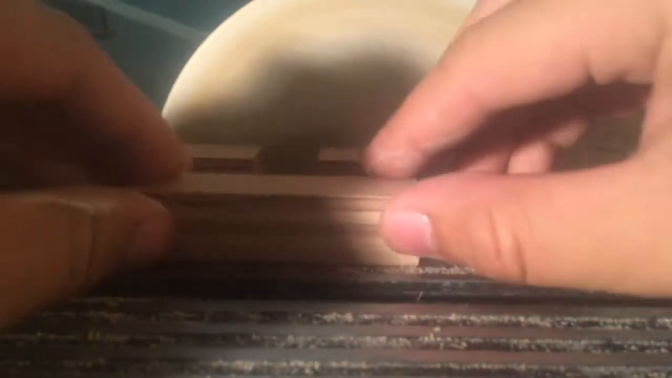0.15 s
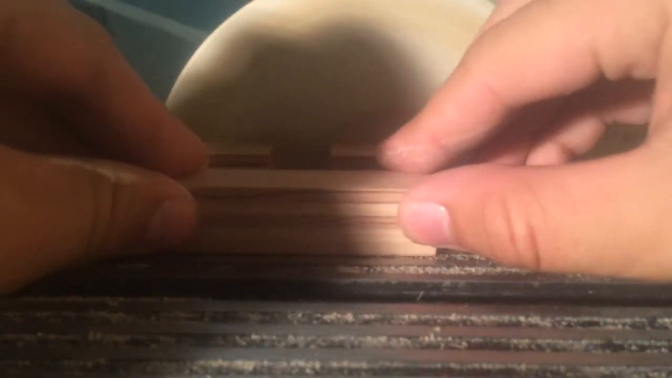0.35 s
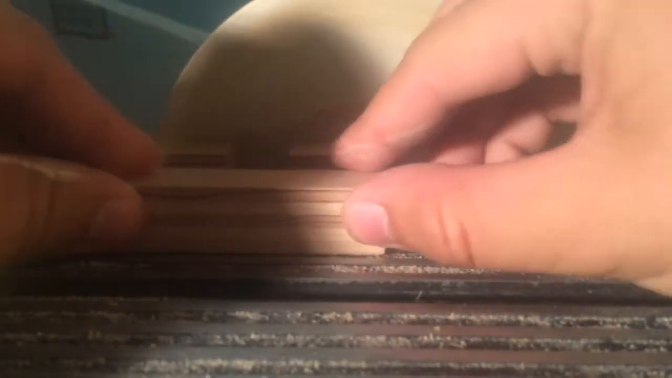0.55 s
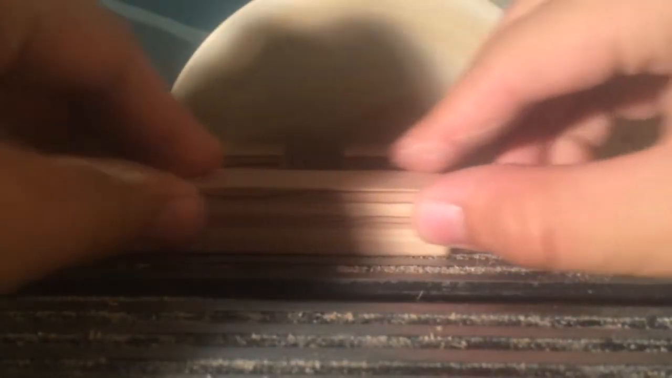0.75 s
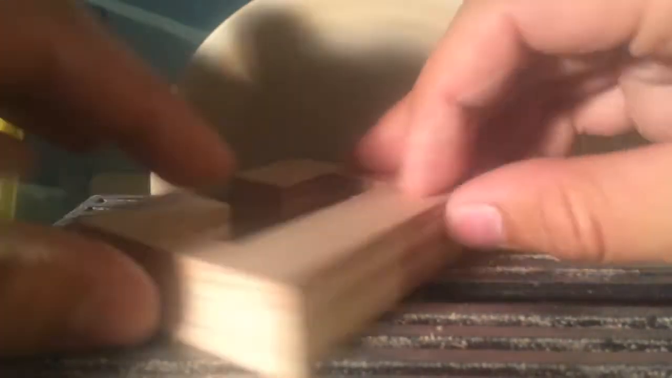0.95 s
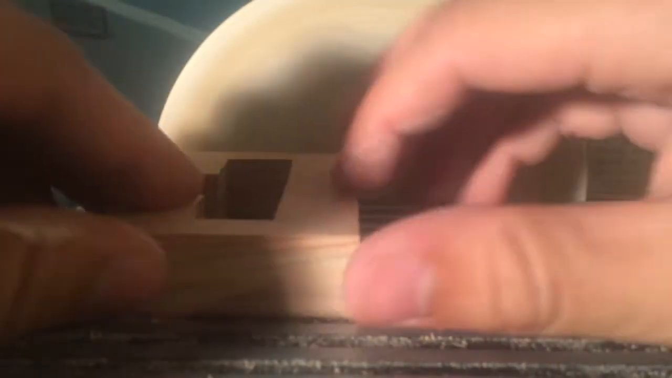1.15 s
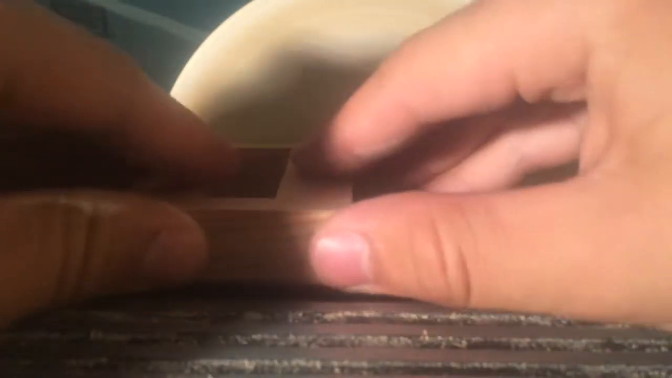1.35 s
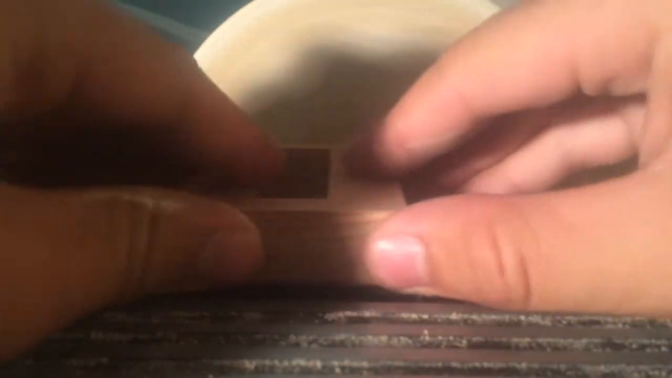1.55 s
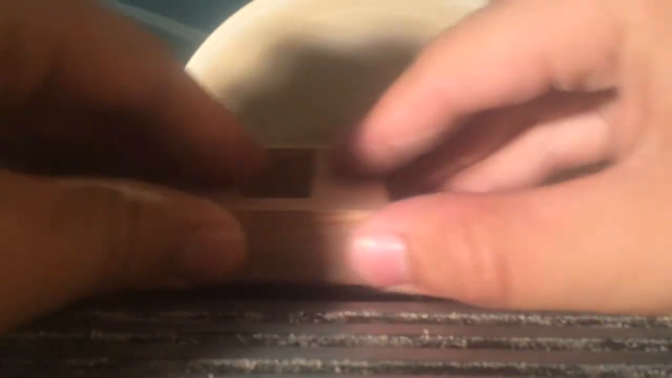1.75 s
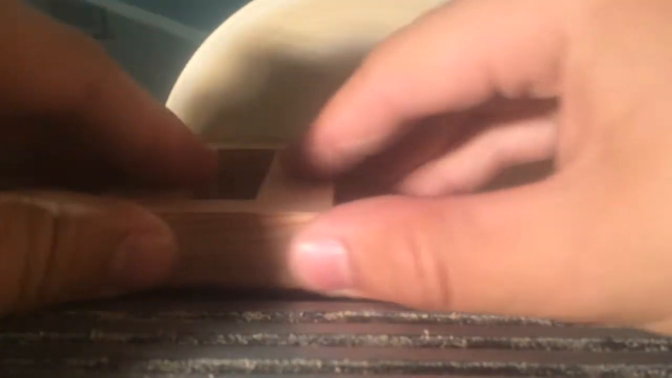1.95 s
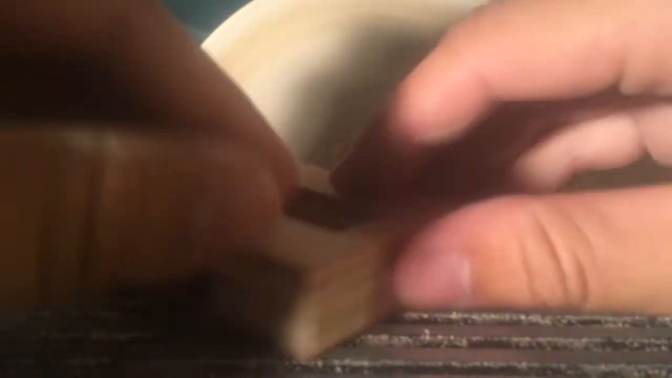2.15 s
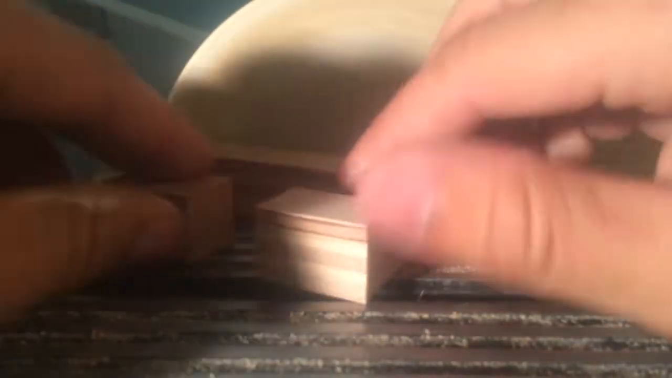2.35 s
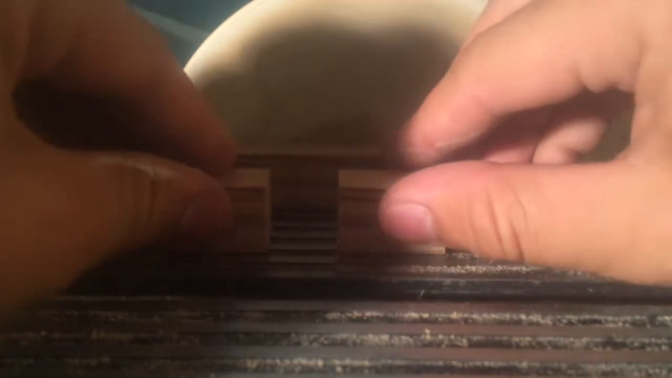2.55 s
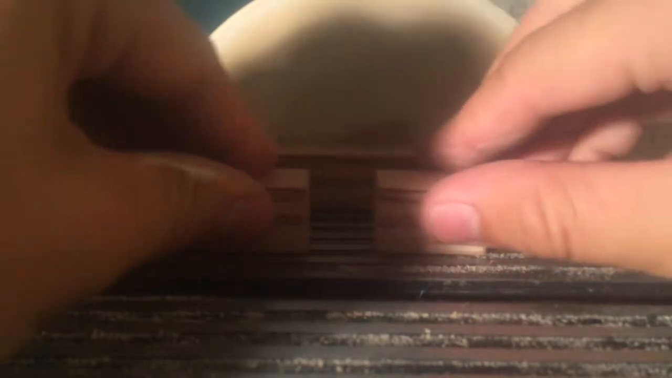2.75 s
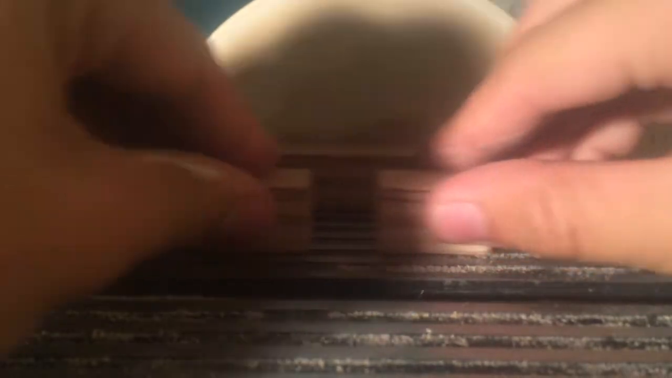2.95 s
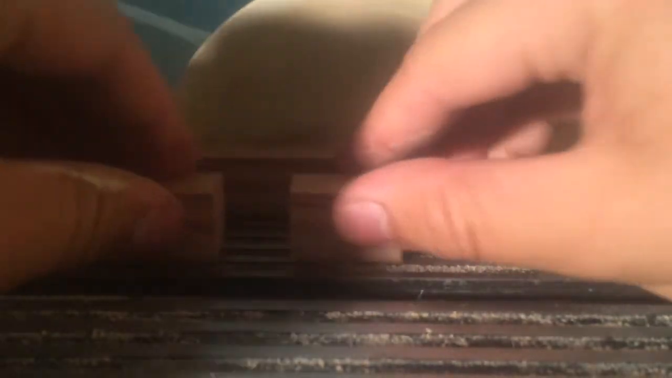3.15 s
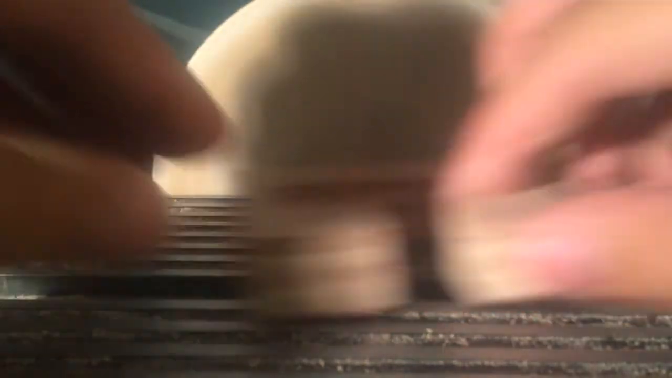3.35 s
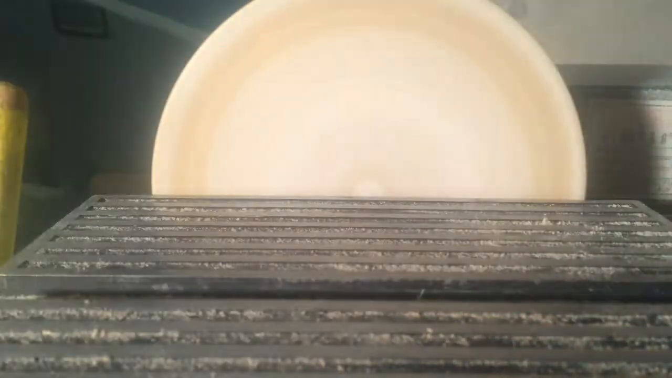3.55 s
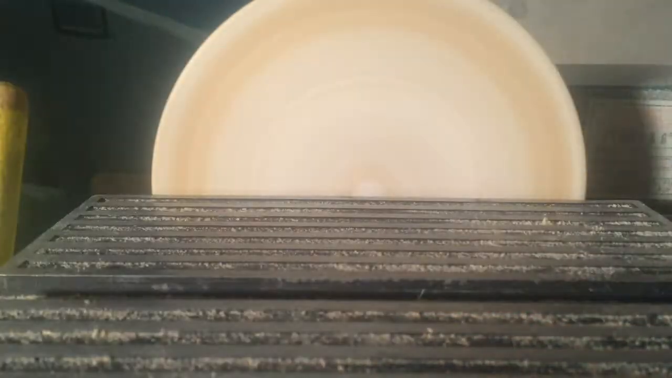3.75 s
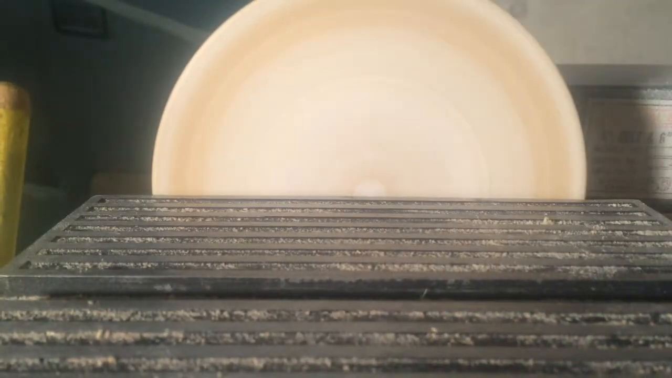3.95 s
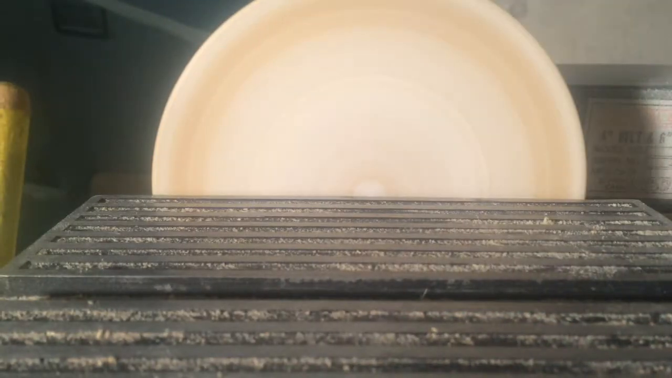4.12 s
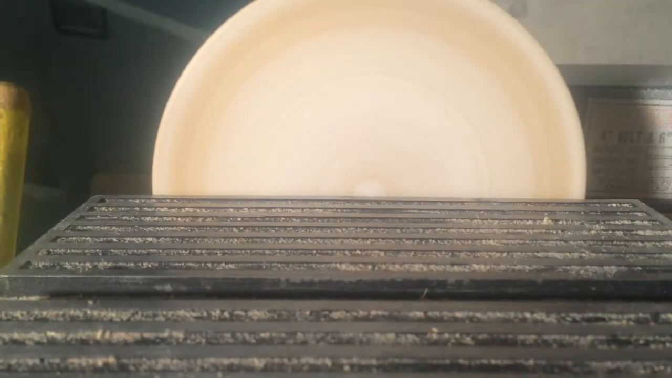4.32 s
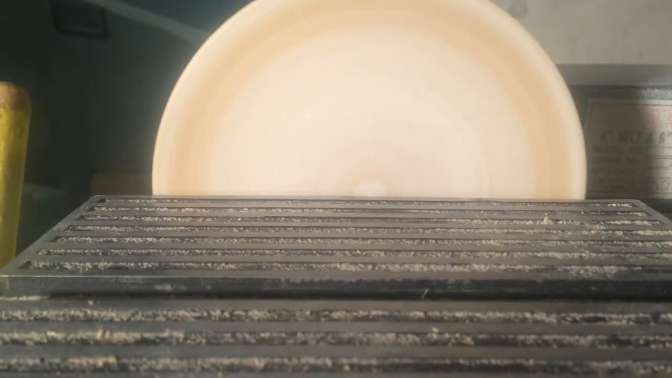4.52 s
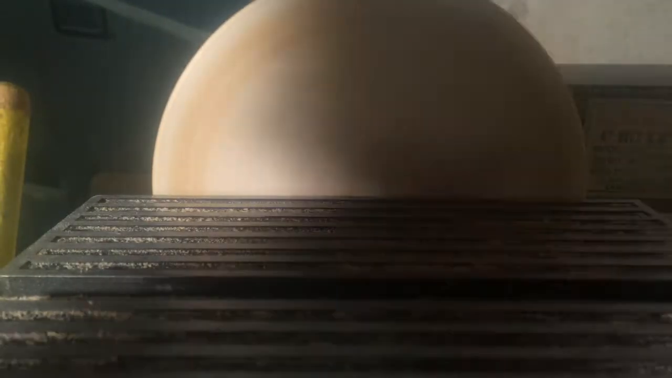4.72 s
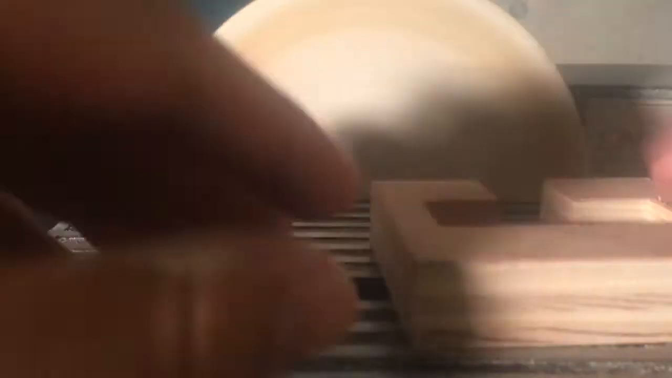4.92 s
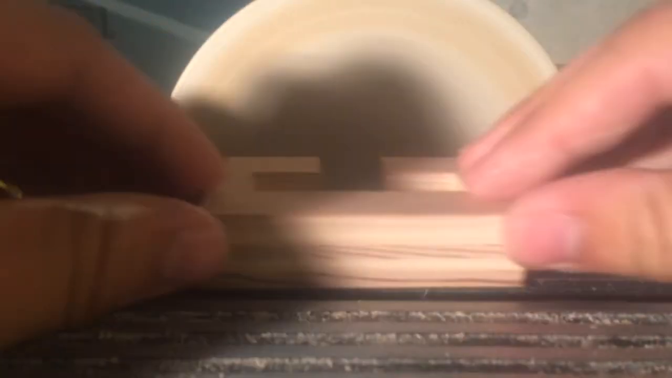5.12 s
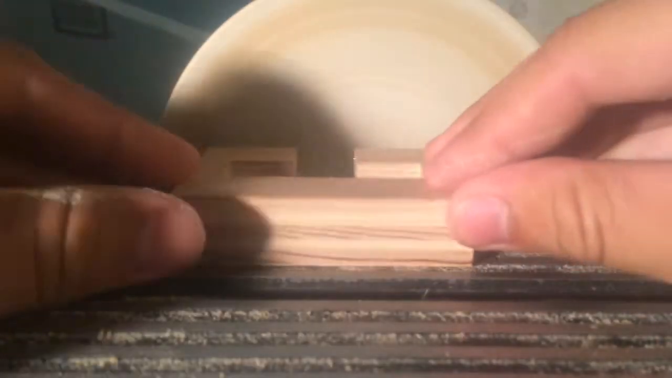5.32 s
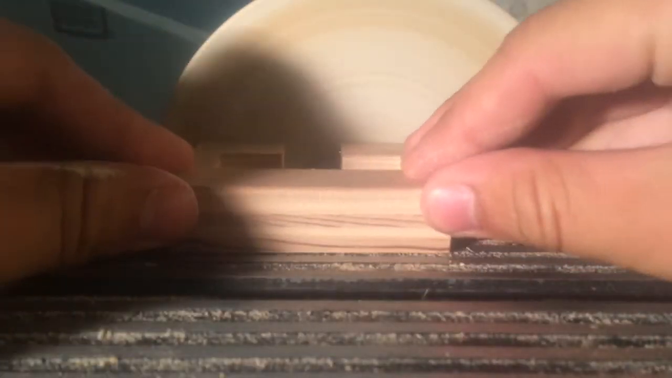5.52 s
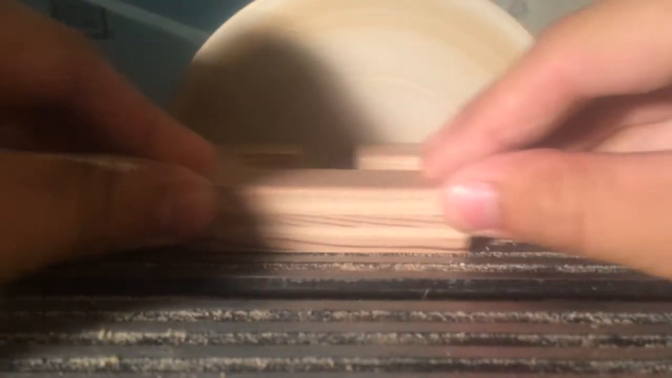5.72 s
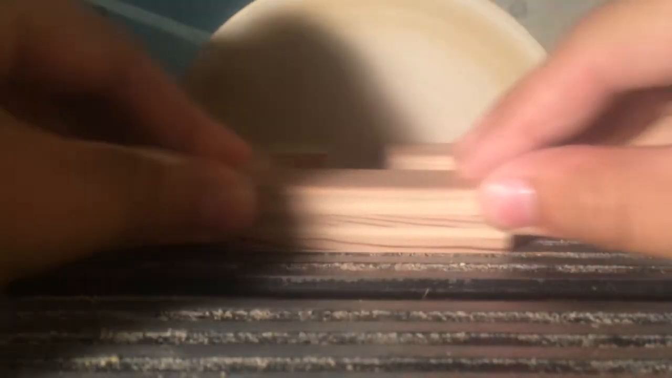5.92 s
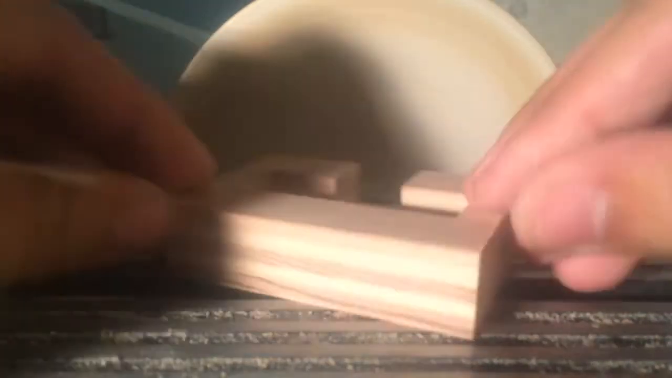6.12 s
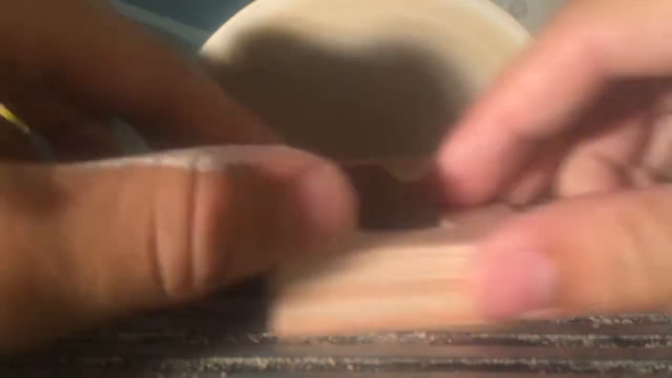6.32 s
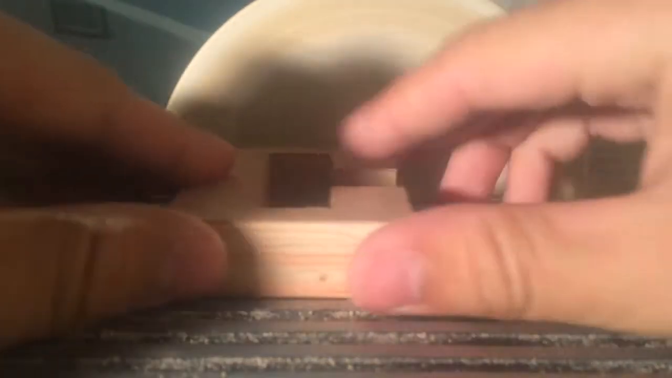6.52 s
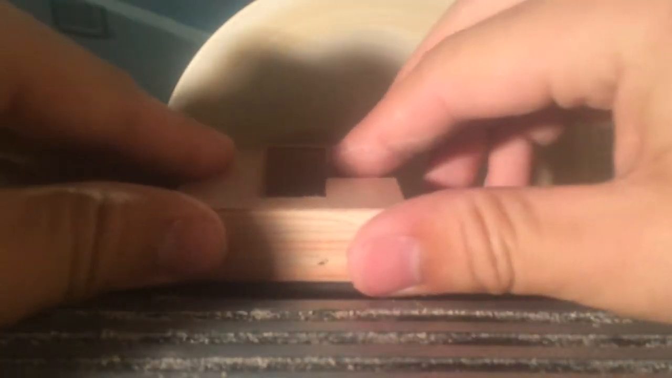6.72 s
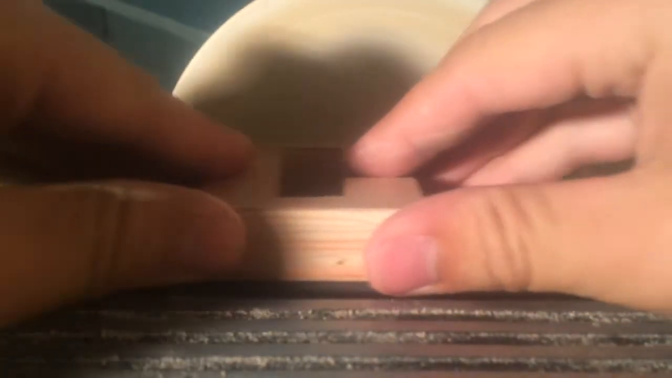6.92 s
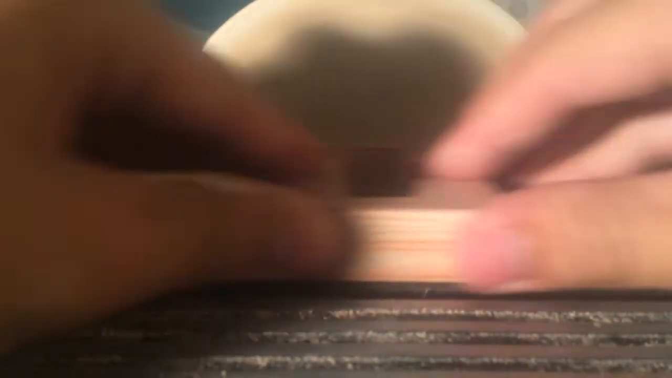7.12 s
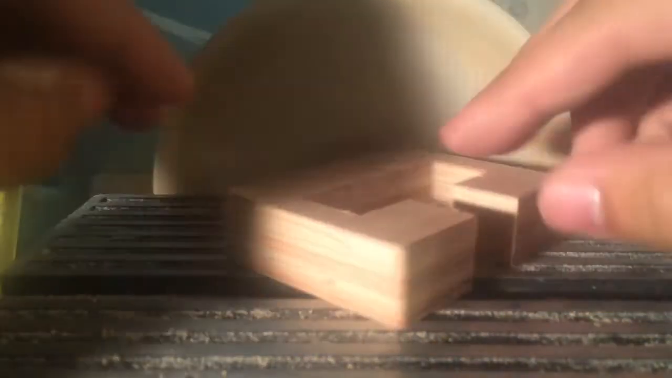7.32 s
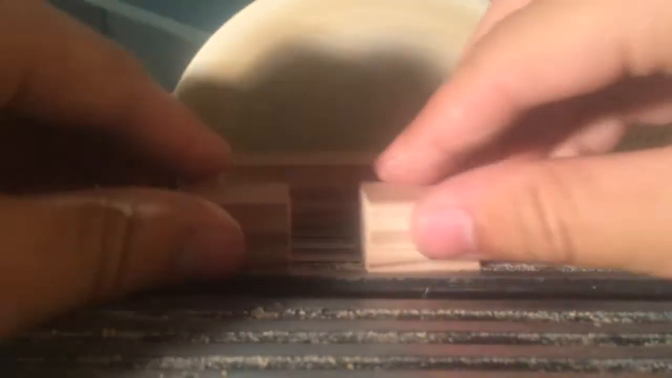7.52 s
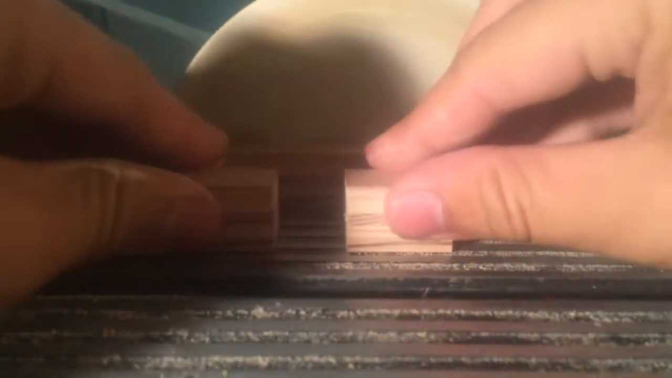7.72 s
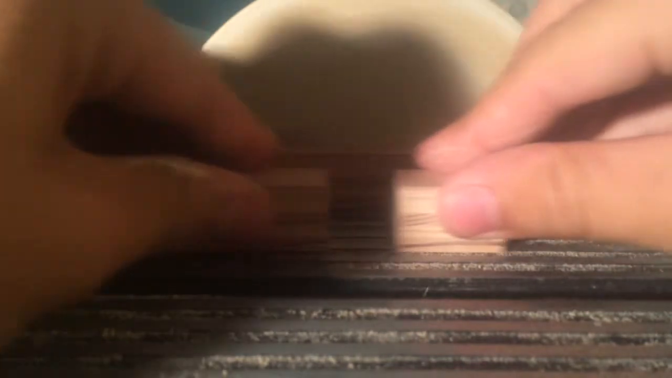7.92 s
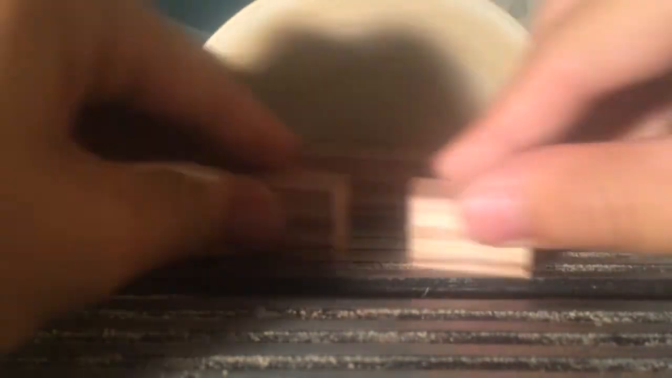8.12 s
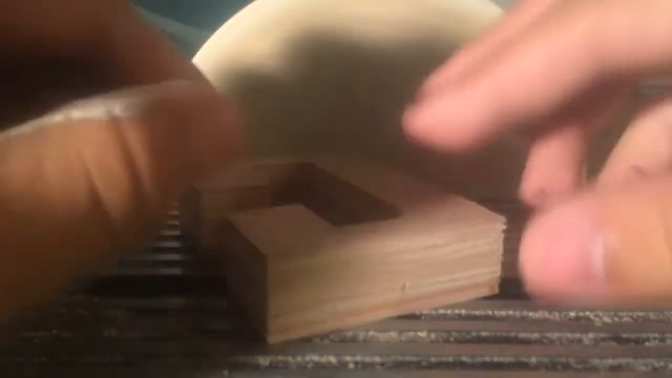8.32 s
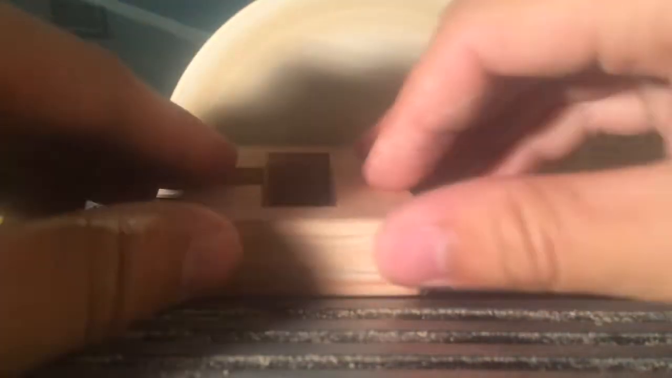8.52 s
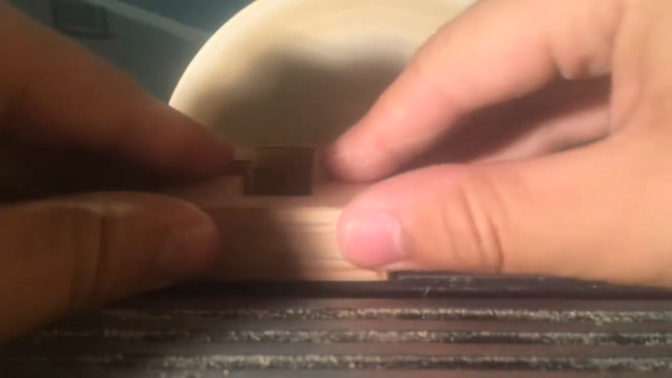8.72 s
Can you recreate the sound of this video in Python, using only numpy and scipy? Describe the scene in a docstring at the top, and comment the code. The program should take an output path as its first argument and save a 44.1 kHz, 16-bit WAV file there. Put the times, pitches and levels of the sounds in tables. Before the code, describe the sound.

A small disc sander is already running close to the microphone, with steady hum, thin bearing whine and rushing air. A plywood piece chatters rapidly on the shaking table. Harsh, bright gritty rasps come at about 0.3-0.85, 1.4-2.0 and 2.6-3.2 seconds, starting sharply and tinged with woody squeals; the motor ducks beneath each and recovers. The rattle is fainter around the third and ends near 3.3. The uncovered disc hisses more openly until 4.8, with a small click at 3.7, a very brief level dip at 3.9 and a click with a dull bump at 4.2. A strong wooden clack lands near 4.9, then firmer rattling and knocks return from 5.1. More rasps follow at 5.6-6.1, 6.7-7.2 and 7.7-8.2, with a prominent squeal at 6.7. A last, lighter one begins at 8.65, cut off at 8.8. Nearby surfaces give a short tail.

```python
"""A small electric disc sander idles close to the microphone in a workshop: hum, whining bearings, rush of air.
From the start a plywood piece rattles on the shaking table; three passes then press it to the disc and the grit
rasps, rings and squeals its modes. In the lull the rattle stops, the hiss opens up, the level dips briefly and
wood clicks and bumps. The rattle returns, and four more passes follow, the piece turned between passes.
Gain control pushes the motor down as the rasp swells; bench and nearby walls lend the wood a short tail."""
import sys
import numpy as np
from scipy import signal
from scipy.fft import rfft, irfft, next_fast_len
from scipy.io import wavfile
from scipy.ndimage import uniform_filter1d, minimum_filter1d

SR = 44100
rng = np.random.default_rng(int(sys.argv[2]) if len(sys.argv) > 2 else 0)


def persist_wave(psi):
    """Save psi, clipped to +-1, as 16-bit WAV."""
    counts = np.round(np.clip(psi, -1, 1) * 32767).astype(np.int16)
    wavfile.write(sys.argv[1], SR, np.atleast_2d(counts).T)


N = 386316

# All levels are relative, as set ahead of the later gains and of the gain control.
# speed of the disc when idle and under load [turns per s]
IDLE_HZ, TURN_HZ = 59.8, 59.17
# hum and whine of the motor: (frequency [Hz], level [dB])
HUM = [(120, -80.5), (174, -73.5), (240, -59), (480, -69.5), (538.3, -70), (660, -71), (855, -79),
       (901, -78.5), (1090, -81), (1106, -73), (1200, -74), (1262, -76), (1346, -65), (1900, -65.5),
       (2939, -67.5), (4062, -67), (4107, -63.5), (5421, -66), (5705, -63.5), (6503, -68), (6530, -72),
       (6562, -79), (7402, -74)]
# resonances of the housing, stirred by the bearings: (frequency [Hz], pole width [Hz], level [dB])
HOUSING = [(1107, 25.6, -58.5), (1327, 220, -57), (1893, 290, -53), (2304, 69, -59.5), (2930, 540, -59.5),
           (3664, 95, -57.5), (4084, 210, -53), (5510, 160, -59.5), (5890, 380, -51.5), (6570, 680, -51.5),
           (7443, 140, -55), (7670, 73, -57.5)]
# rush of air and bearings: (frequency [Hz], spectrum level [dB])
RUSH = [(30, -30), (80, -13.5), (140, -9), (180, -2.5), (560, -1), (780, -6), (1500, 2.5), (3200, 3),
        (5000, 2.5), (7000, 3.5), (8400, -1), (9600, -9.5), (11500, -14.5), (16000, -23)]
# the hands leave the disc uncovered and its hiss comes through: (from [s], to [s], gain [dB])
UNCOVERED = (3.4, 4.8, 2.6)
SHIELD_HZ = 5000  # the hands shield housing resonances above this
# the piece lies on the shaking table: (from [s], to [s], strength of rattle [dB])
RESTS = [(0, .85, -35.5), (.85, 2.0, -33.5), (2.0, 3.34, -42.5), (5.057, 6.15, -34), (6.15, 8.8, -33)]
# fast faint chatter and slower, firmer rocking of the piece: (hops [per s], level [dB])
HOPS = [(74.95, -2.5), (16.02, 2.5)]
# firmest knocks of the piece on the table: (time [s], level [dB])
KNOCKS = [(0.9524, -34.5), (1.1025, -33), (1.222, -32.5), (1.338, -32.5), (5.0842, -28), (5.404, -32),
          (5.5879, -23.5), (5.911, -29), (6.2314, -27), (6.3674, -32), (6.4157, -32.5), (6.5529, -27.5),
          (6.6007, -27), (6.735, -26), (7.2945, -29.5), (7.6105, -27), (8.121, -27.5), (8.2556, -31.5),
          (8.4406, -27), (8.576, -32.5)]
# modes of the table under a knock: (frequency [Hz], level [dB], t60 [s])
TABLE_MODES = [(1096.7, -11.5, 0.15), (1375, -19, 0.11), (1935, 0.5, 0.036), (2175, 13.5, 0.011),
               (2374, 3, 0.01), (2600, -10, 0.0073)]
DRIVEN_DB = 4  # the disc shakes the piece harder while it touches
# passes against the disc: (start [s], end [s], release [s], base bite: low rasp over high rasp [dB])
PASSES = [(0.274, 0.849, 0.048, -5.5), (1.386, 2.001, 0.035, -0.5), (2.582, 3.184, 0.023, -5),
          (5.56, 6.068, 0.028, -4), (6.693, 7.23, 0.064, -3), (7.718, 8.178, 0.077, -3.5),
          (8.66, 8.8, 0.034, -3)]
# pressure of the hands, one curve a pass: (time [s], level [dB])
PRESSURE = [
    [(0.28, -35), (0.292, -35), (0.304, -27.5), (0.404, -34.5), (0.584, -31), (0.796, -41), (0.81, -42.5)],
    [(1.395, -30.5), (1.435, -39), (1.447, -35.5), (1.589, -40), (1.705, -32.5), (1.749, -37), (1.775, -44),
     (1.97, -37)],
    [(2.59, -30.5), (2.726, -34.5), (2.886, -31), (2.92, -36.5), (3.14, -33), (3.15, -37)],
    [(5.57, -31.5), (5.594, -34), (5.786, -37.5), (5.804, -28.5), (5.966, -37), (6.004, -28.5),
     (6.028, -40), (6.035, -36.5)],
    [(6.7, -33), (6.84, -37), (6.866, -39.5), (6.97, -32.5), (7.002, -35.5), (7.018, -48), (7.034, -35.5),
     (7.17, -39.5)],
    [(7.73, -31), (7.77, -34.5), (7.84, -31.5), (7.97, -35.5), (7.978, -32.5), (8.044, -38), (8.068, -33),
     (8.11, -40.5)],
    [(8.665, -35), (8.671, -33), (8.697, -45), (8.723, -47), (8.733, -52), (8.755, -50)],
]
# plain rasp of the grit: (frequency [Hz], spectrum level [dB])
RASP = [(50, -37), (300, -19.5), (800, -20.5), (1100, -6), (1550, -11.5), (2000, -5), (3800, -4.5),
        (5200, 0.5), (7000, -2), (8800, 1), (11000, -7), (12200, -11), (13800, -11), (15700, -15)]
# main modes of the plywood piece: (frequency [Hz], pole width [Hz])
WOOD = [(1350, 66), (2780, 200), (4650, 590), (6170, 740), (7950, 430), (9400, 880), (10650, 1300)]
# one row a pass, set by the edge that touches the disc: (level of each main mode against the rasp [dB], ...)
EDGES = [(-29, -10, -6, -4, -15, -5, -12), (-23, -12, -2, -5, -15, -27, -12),
         (-19.5, -14, -9, -2.5, -3.5, -14.5, -19), (-26, -13.5, -6, -3.5, -6, -1, -13.5),
         (-20, -17, -11, 1.5, -6, -19.5, -6), (-19.5, -13.5, -11.5, -4, -4, -22, -17),
         (-18, -16, -8.5, -7, -23, -20, -15)]
# weaker plywood modes, alike on every edge: (frequency [Hz], pole width [Hz], level against the rasp [dB])
FAINT_MODES = [(3330, 410, -19.5), (5420, 150, -12), (6170, 70, -10), (8920, 320, -15.5),
               (10000, 280, -14.5), (10500, 210, -16), (12470, 160, -21.5), (14240, 260, -25)]
# the edge meets the grit at once and is drawn away gradually, falling by RELEASE_DB over its release
ATTACK_S, RELEASE_DB = 0.0042, -19
# the rasp is duller as the edge lands, and under a light touch (dB of bite per dB of pressure below firm)
LANDING_BITE_DB, LANDING_S, LIGHT_BITE, FIRM_DB = 4.5, 0.023, 0.43, -35.5
# one mode of the wood catches on the grit:
# (start [s], length [s], frequency [Hz], pole width [Hz], level [dB])
SQUEALS = [(0.274, 0.033, 3340, 1700, -29), (0.406, .15, 9370, 300, -30), (0.498, 0.073, 2740, 150, -42.5),
           (1.412, 0.17, 4600, 330, -33.5), (1.643, .1, 6460, 900, -32), (1.871, 0.11, 4440, 330, -40),
           (1.861, .1, 2830, 300, -44), (2.589, 0.12, 7750, 220, -35), (2.868, 0.32, 2764, 99, -39.5),
           (5.823, 0.042, 4860, 220, -27), (6.7, 0.161, 6140, 220, -25.5), (6.805, 0.21, 4670, 340, -30.5),
           (6.825, 0.195, 5440, 500, -34), (6.97, 0.21, 6100, 180, -34.5), (7.145, 0.064, 4640, 340, -37),
           (7.8, 0.1, 1330, 110, -40), (7.779, 0.12, 2710, 260, -37.5), (7.847, 0.12, 4740, 300, -33.5)]
# clicks of wood: (time [s], level [dB], centre [Hz], width [octaves], t60 [s])
CLICKS = [(.729, -17, 8000, 0.49, .01), (3.664, -34, 3870, 0.41, 0.034), (4.1963, -24, 9100, 0.32, 0.013),
          (4.197, -30, 3530, 0.64, .024), (4.542, -40, 10500, .7, .011), (4.871, -17.5, 4000, 1.9, .045),
          (4.8798, -11.5, 2760, 0.85, 0.02), (4.888, -14.5, 7400, 0.89, .036), (5.085, -36, 2600, .9, .015),
          (5.763, -22, 8000, 0.55, .0092), (6.0354, -16, 7040, 0.59, .03)]
# ring of the loose piece after a click: (frequency [Hz], level [dB], t60 [s])
PIECE = [(2650, -11, 0.056), (4480, -12, 0.12), (4890, -12.5, 0.13), (8150, -13, 0.054)]
# dull bumps on the table: (time [s], level [dB], centre [Hz], t60 [s])
BUMPS = [(3.99, -54, 119.5, 0.2), (4.197, -41, 740, .06), (4.872, -41, 674, 0.067), (5.99, -41, 690, 0.11),
         (5.995, -57, 110, .12)]
BUMP_OCTAVES, BUMP_RING_DB = 0.3, 0  # width of the burst; ring against the burst's peak
# the whole level dips briefly, with the first and last levels held outside: (time [s], level [dB])
DIP = [(3.862, 0.5), (3.875, -13), (3.882, -25), (3.893, -12), (3.915, 0.5)]
CEILING = .118  # peak that the limiter lets through to the band limit (full scale 1)
EDGE_HZ = 15850  # upper band limit


def gain_of(db):
    """Decibels to amplitude."""
    return np.exp(np.asarray(db) * (np.log(10) / 20))


def evened(x):
    """Scales to rms 1."""
    return x / np.sqrt(np.mean(x ** 2) + 1e-20)


def follow(rows):
    """Joins (time, value) rows by straight lines into a value at every sample."""
    return np.interp(np.arange(N) / SR, *np.transpose(rows))


def during(start, end):
    t = np.arange(N) / SR
    return (t >= start) & (t < end)


def add(mix, s, sound):
    """Mixes a sound in at a time."""
    part = mix[max(round(s * SR), 0):][:len(sound)]
    part += sound[:len(part)]


def colour(x, points):
    """Filters by a spectrum of (Hz, dB) points."""
    hz, db = np.transpose(points)
    size = next_fast_len(len(x))
    bins = np.fft.rfftfreq(size, 1 / SR)
    response = gain_of(np.interp(np.log(bins + 1), np.log(hz), db))
    return irfft(rfft(x, size) * response, size)[:len(x)]


def resonate(x, hz, width):
    """A steep-sided resonance of two equal poles, with a zero against the bass, at rms 1."""
    pole = np.exp((2j * hz - width) * np.pi / SR)
    return evened(signal.lfilter([1, -1], np.poly([pole, pole]), x).real)


def drift(size, rate):
    """Slow random wandering around 0, low-passed at a rate in Hz and scaled to rms 1."""
    knots = rng.standard_normal(size // 64 + 2)
    lowpass = signal.butter(2, rate, fs=SR / 64, output="sos")
    slow = evened(signal.sosfilt(lowpass, knots))
    return np.interp(np.arange(size) / 64, np.arange(len(slow)), slow)


def wobble(turns, depth_db, count=256):
    """The disc is not flat: contact swells and slackens in the same way at every turn."""
    angle = np.arange(count) / count
    shape = sum(np.cos(2 * np.pi * (k * angle + rng.random())) / k for k in range(1, 5))
    return gain_of(depth_db * evened(shape))[(turns % 1 * count).astype(int)]


def motor(waver_db=3.0, speed_wander=0.001182, throb_db=1.0, rush_db=-51, orders_db=-77):
    """Magnetic hum, shaft orders, bearing noise ringing in the housing, and a rush of air."""
    t = np.arange(N) / SR
    bent = t + np.cumsum(speed_wander * drift(N, 5.23)) / SR  # the speed wanders by this fraction (rms)

    hum = np.zeros(N)
    for hz, db in HUM:
        waver = waver_db * min(hz / 500, 1.5) * drift(N, 25.5)  # higher tones waver more
        hum += gain_of(db + waver) * np.sin(2 * np.pi * (hz * bent + rng.random()))
    orders = sum(np.sin(2 * np.pi * (k * IDLE_HZ * bent + rng.random())) for k in range(5, 24))

    away, back, open_db = UNCOVERED
    uncovered = gain_of(open_db * uniform_filter1d(during(away, back) * 1., size=4000))
    bearings = np.zeros(N)
    for hz, width, db in HOUSING:
        shield = uncovered if hz > SHIELD_HZ else 1
        bearings += gain_of(db) * shield * resonate(rng.standard_normal(N), hz, width)
    bearings *= wobble(IDLE_HZ * t, throb_db) * gain_of(0.87 * drift(N, 24))

    rush = gain_of(rush_db) * evened(colour(rng.standard_normal(N), RUSH))
    tones = np.sqrt(2) * (hum + gain_of(orders_db) * orders)  # sines to rms level
    return tones + gain_of(-2.0) * bearings + rush


def rattle(knock_db=1.0, uneven_db=1.1, soft_s=0.0014):
    """The piece hops on the shaking table: a few firm knocks among many faint ones ring its modes."""
    t = np.arange(SR // 6) / SR
    ring = sum(gain_of(db - 60 * t / t60) * np.sin(2 * np.pi * hz * t) for hz, db, t60 in TABLE_MODES)
    ring *= 1 - np.exp(-t / soft_s)  # soft contact

    pressed = sum(during(start, end) for start, end, *_ in PASSES)
    resting = sum(gain_of(db) * during(start, end) for start, end, db in RESTS)
    shaking = resting * gain_of(DRIVEN_DB * pressed + uneven_db * drift(N, 12.4))

    blows = np.zeros(N)
    for per_s, db in HOPS:
        # the piece needs time to fall back, so hops are uneven but never pile up
        hops = np.cumsum(rng.uniform(.45, 1.55, size=2000)) * SR / per_s
        hops = hops[hops < N].astype(int)
        blows[hops] += rng.uniform(-1.03, 1, len(hops)) * gain_of(db) * shaking[hops]
    for s, db in KNOCKS:
        add(blows, s, gain_of([db + knock_db]))
    return signal.oaconvolve(blows, ring / abs(ring).max())[:N]


def grit(size, per_s, spread_db):
    """Tiny random impacts of very unequal strength, at rms 1."""
    strength = gain_of(spread_db * np.minimum(rng.exponential(1, size), 4))
    struck = rng.random(size) < per_s / SR
    return evened(rng.standard_normal(size) * strength * struck)


def stroke(start, end, release, bite_db, pressure, edge, repeat=0.35, slip=.002, ring_wobble_db=3,
           rasp_wobble_db=0.5, flutter_db=0.5, sway_db=3.0, ring_db=1.5, level_db=7.5):
    """Grit tears at the wood and rings its modes; some grains come round again at each turn."""
    t = np.arange(start, end, 1 / SR)
    size, share = len(t), np.clip(repeat, 0, 1)
    turns = np.cumsum(TURN_HZ * (1 + slip * drift(size, 8))) / SR  # the load makes the speed uneven

    track = grit(round(SR / TURN_HZ), 22000, 3.4)  # grains of one whole turn
    repeated = track[(turns % 1 * len(track)).astype(int)]
    drive = np.sqrt(share) * repeated + np.sqrt(1 - share) * grit(size, 12000, 2.1)
    drive *= gain_of(flutter_db * drift(size, 55))
    sound = evened(colour(drive * wobble(turns, rasp_wobble_db), RASP))

    modes = [(hz, width, db) for (hz, width), db in zip(WOOD, edge)] + list(FAINT_MODES)
    for hz, width, db in modes:
        # each mode is fed by its own part of the edge, at its own moment of the turn, and sways as the piece rocks
        feed = np.roll(drive, rng.integers(size)) * wobble(turns, ring_wobble_db)
        sway = sway_db * drift(size, 7.8)
        sound += gain_of(db + ring_db + sway) * resonate(feed, hz, width)

    drawn_away = np.clip(1 - (end - t) / release, 0, 1)
    force_db = np.interp(t, *np.transpose(pressure)) + RELEASE_DB * drawn_away
    # a deeper bite brings out the low modes
    landing = LANDING_BITE_DB * np.exp((start - t) / LANDING_S)
    bite = bite_db + landing + LIGHT_BITE * (FIRM_DB - force_db)
    low = signal.sosfiltfilt(signal.butter(6, 7000, fs=SR, output="sos"), sound)
    sound = evened(sound - low) + gain_of(bite) * evened(low)
    touch = np.clip(np.minimum(t - start, end - t) / ATTACK_S, 0, 1)
    return start, gain_of(level_db + force_db) * sound * touch


def squeal(length, hz, width, db, throb_db=3):
    """One mode rings out, throbbing with the turns of the disc."""
    t = np.arange(0, length, 1 / SR)
    ring = resonate(rng.standard_normal(len(t)), hz, width) * wobble(TURN_HZ * t, throb_db)
    return gain_of(db) * evened(ring) * signal.windows.tukey(len(t), .3)


def blow(db, hz, t60, octaves, modes=()):
    """A short dry burst around one pitch; it rings the modes that lie near that pitch."""
    t = np.arange(SR // 4) / SR

    def reach(f):
        """How strongly the blow excites a frequency."""
        return 1 / (1 + (np.log2((f + 1) / hz) / octaves) ** 2) ** 2

    spectrum = rfft(rng.standard_normal(len(t))) * reach(np.fft.rfftfreq(len(t), 1 / SR))
    burst = irfft(spectrum, len(t)) * gain_of(-60 * t / t60)
    ring = sum(reach(f) * gain_of(level - 60 * t / decay) * np.sin(2 * np.pi * f * t)
               for f, level, decay in modes)
    onset = 1 - np.exp(-t * hz)
    return gain_of(db) * (burst / abs(burst).max() + ring) * onset


def workshop(x, t60=0.14, wet_db=-13):
    """A short tail of sparse random echoes from the bench and nearby walls."""
    t = np.arange(SR // 3) / SR
    echoes = rng.standard_normal(len(t)) * (rng.random(len(t)) < 2000 / SR)
    tail = echoes * (t > .002) * gain_of(-60 * t / t60)
    return x + gain_of(wet_db) * signal.oaconvolve(x, tail / np.linalg.norm(tail))[:N]


def scene():
    """The wood with its workshop tail and the dry motor on one bench, under the brief level dip."""
    wood = rattle()
    for row, pressure, edge in zip(PASSES, PRESSURE, EDGES):
        add(wood, *stroke(*row, pressure, edge))
    for s, *ring in SQUEALS:
        add(wood, s, squeal(*ring))
    for s, db, hz, octaves, t60 in CLICKS:
        add(wood, s, blow(db, hz, t60, octaves, PIECE))
    for s, db, hz, t60 in BUMPS:
        add(wood, s, blow(db, hz, t60, BUMP_OCTAVES, [(hz, BUMP_RING_DB, t60)]))
    return (motor() + workshop(wood))[None] * gain_of(follow(DIP))


def record(dry, threshold_db=-37, most_db=9, recover_db_per_s=55, hold_s=0.0054):
    """Gain control falls fast on the rasp, holds, then recovers; a peak limiter and the band limit follow."""
    power_db = 10 * np.log10(abs(uniform_filter1d(dry[0] ** 2, size=600)) + 1e-12)
    over_db = np.clip(power_db - threshold_db, 0, most_db)
    half = max(round(hold_s * SR / 2), 1)
    held_db = -minimum_filter1d(-over_db, 2 * half + 1, origin=half)
    # the reduction drops no faster than the recovery rate
    fall = np.arange(N) * recover_db_per_s / SR
    reduction_db = np.maximum.accumulate(held_db + fall) - fall
    ducked = dry[0] / gain_of(uniform_filter1d(reduction_db, size=200))

    headroom = CEILING / np.maximum(abs(ducked), CEILING)
    limited = ducked * uniform_filter1d(minimum_filter1d(headroom, size=65), size=65)
    band_limit = signal.firwin(511, EDGE_HZ, window=("kaiser", 9), fs=SR)
    return signal.oaconvolve(limited, band_limit, "same")[None]


dry = scene()
out = record(dry)
persist_wave(out)
```